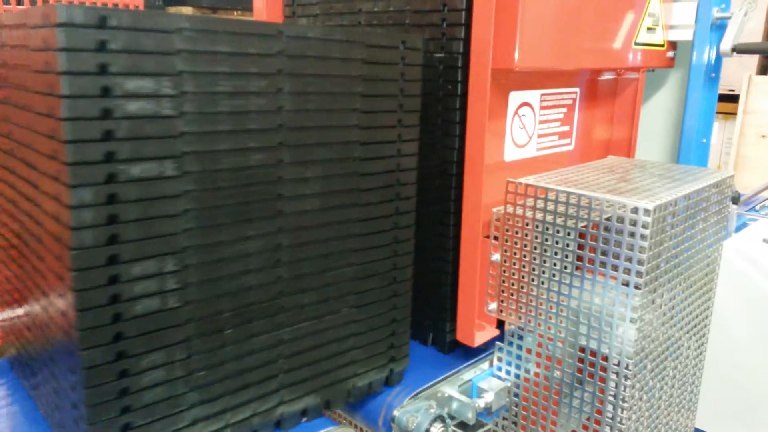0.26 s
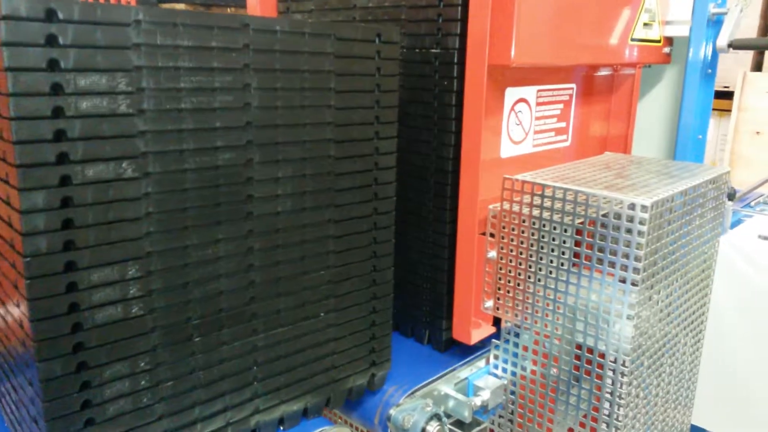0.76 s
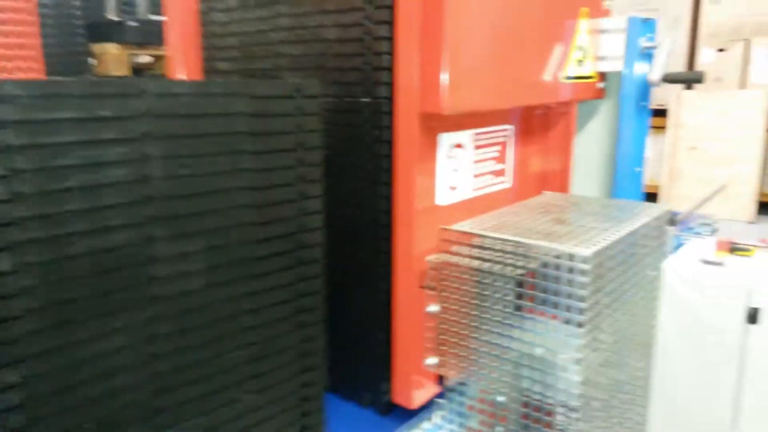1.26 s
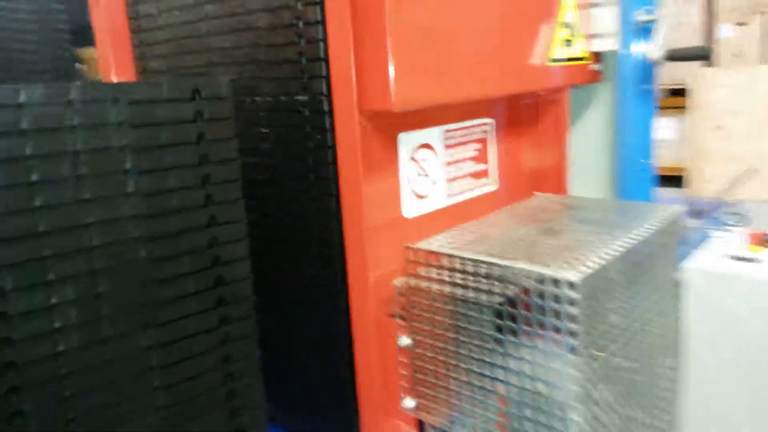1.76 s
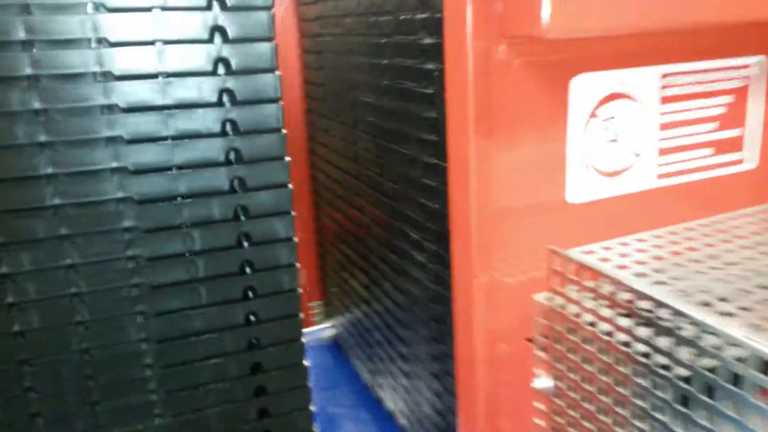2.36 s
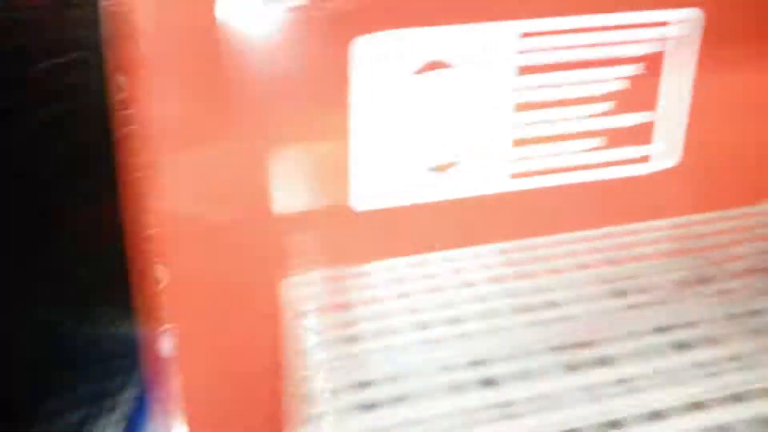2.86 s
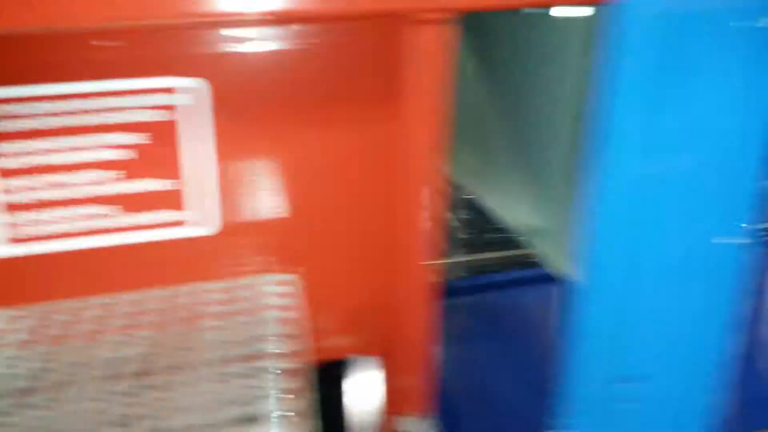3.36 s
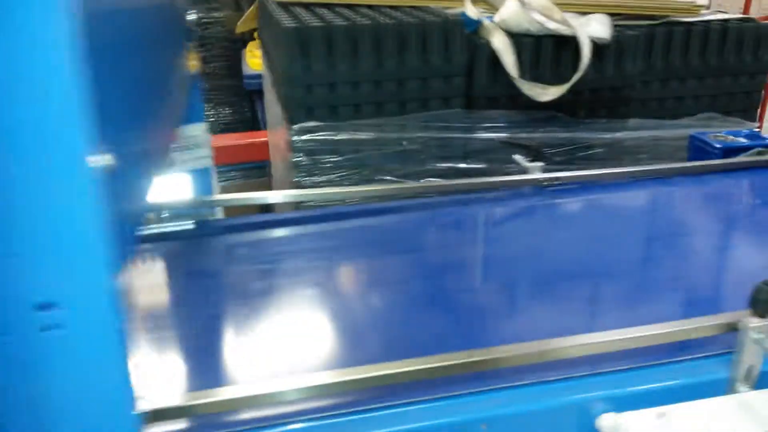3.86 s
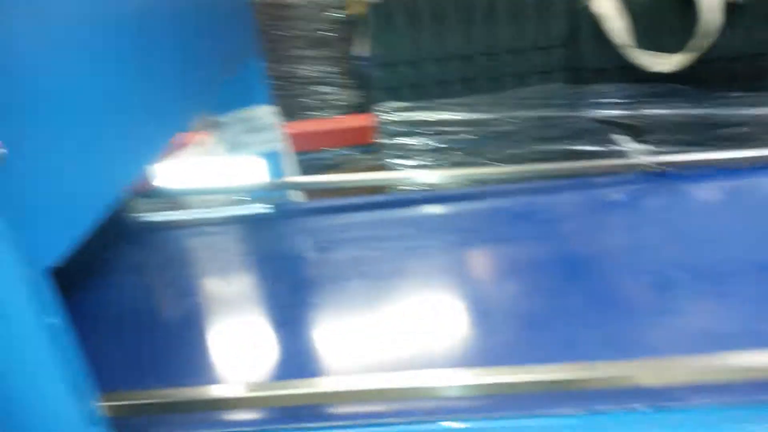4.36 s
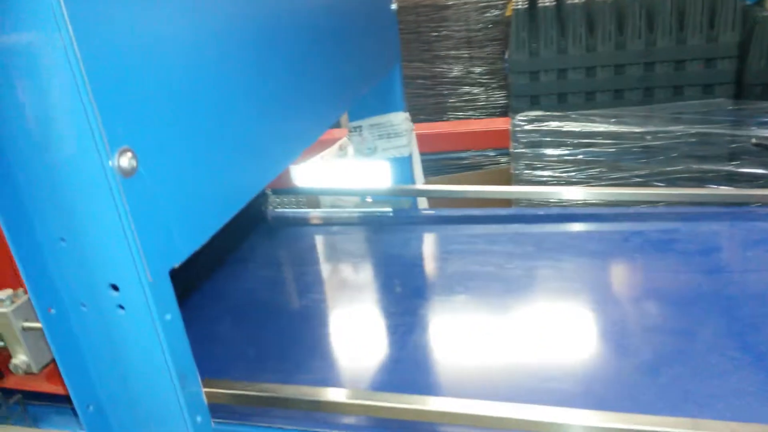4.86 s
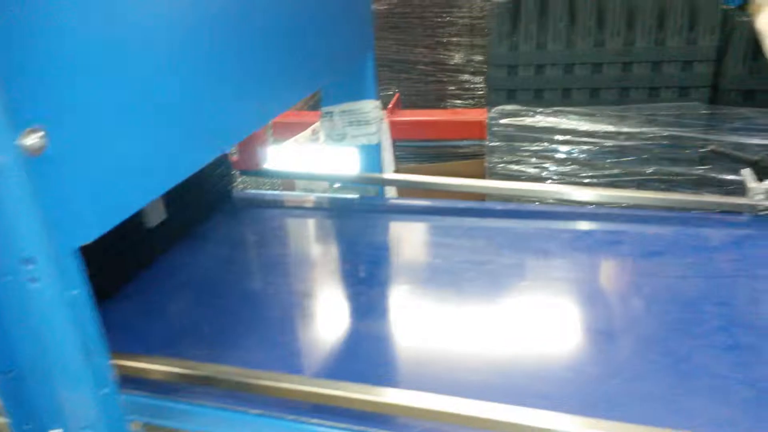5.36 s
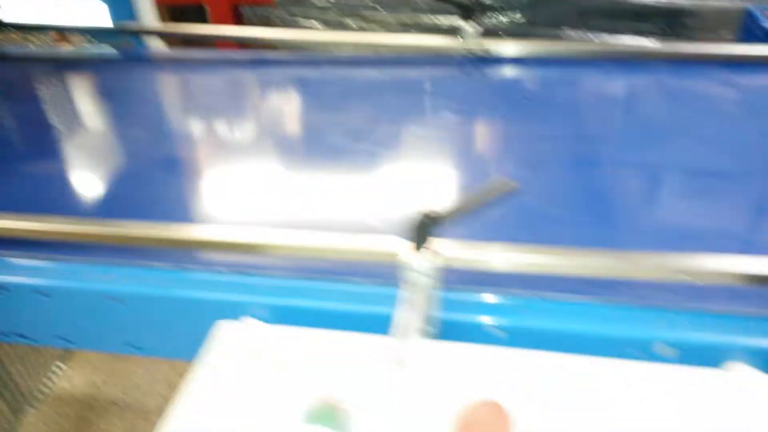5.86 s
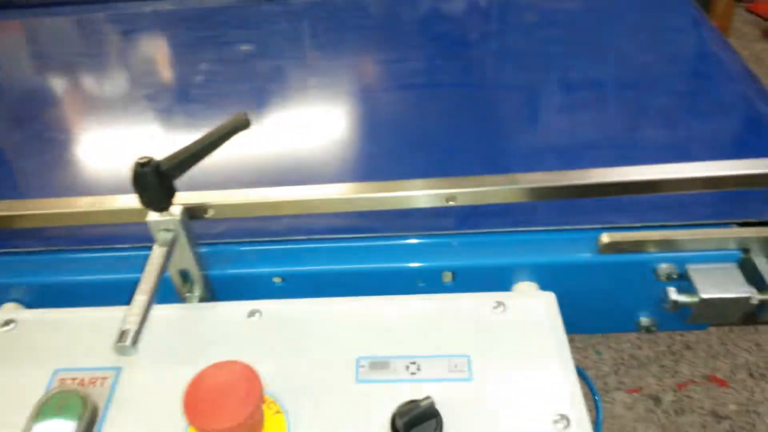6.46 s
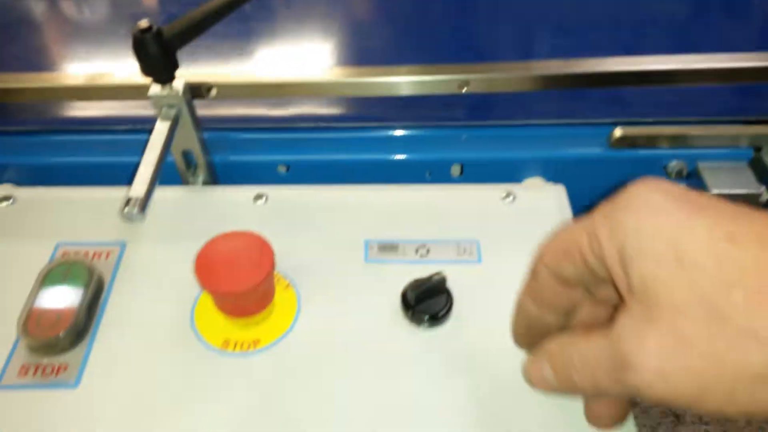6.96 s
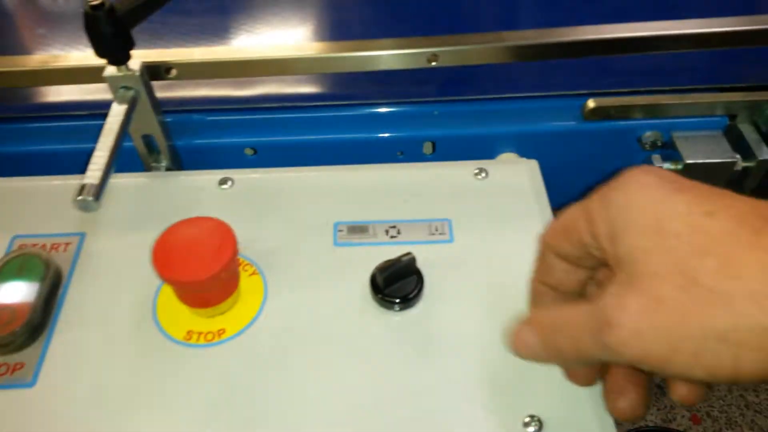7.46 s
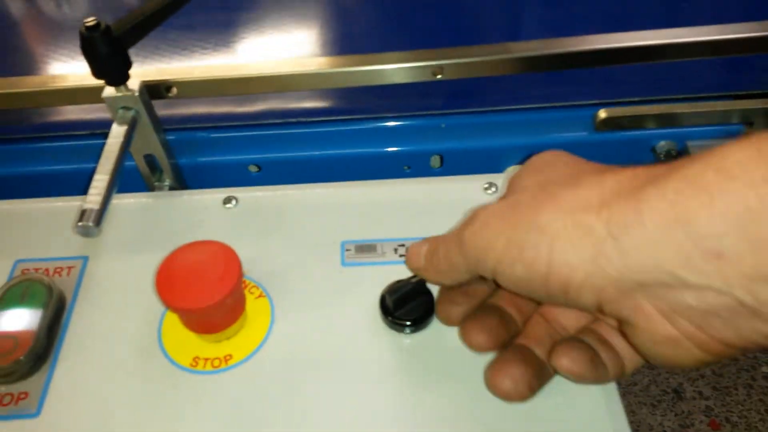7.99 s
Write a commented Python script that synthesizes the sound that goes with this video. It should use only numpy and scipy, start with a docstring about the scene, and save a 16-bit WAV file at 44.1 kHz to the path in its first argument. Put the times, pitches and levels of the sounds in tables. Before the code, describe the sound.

A conveyor motor whines and brakes to rest as plastic trays clatter, then after quiet scraping two loud bursts of clacks and small hard clicks.

```python
"""Workshop, close to a tray conveyor, on a hand-held microphone that moves to the control panel.
The inverter-fed motor whines on modulated sines over a rumbling belt of filtered noise, brakes and holds.
Stacks of plastic trays knock, scrape and clatter: noise bursts ring resonances of tray, stack and steel.
A small hard part clicks to rest in high resonances, and a soft whirr of banded noise swells and fades.
Mains hum in wavering sines, a machinery drone and a thin hiss of filtered noise go on underneath."""
import sys
import numpy as np
from scipy import signal
from scipy.fft import rfft, irfft
from scipy.io import wavfile

SR = 44100
rng = np.random.default_rng(int(sys.argv[2]) if len(sys.argv) > 2 else 0)


def log_audio(samples):
    """Write samples as a 16-bit WAV file to the path given in sys.argv[1]."""
    # one column per channel
    frames = np.atleast_2d(samples).T
    # limit to full scale, then quantise
    limited = np.clip(frames, -1, 1)
    pcm = np.round(limited * 32767).astype(np.int16)
    wavfile.write(sys.argv[1], SR, pcm)


N = 362943
T = np.arange(N) / SR  # seconds


# motor supply: a straight ramp up to the running frequency, then a rounded braking ramp to rest
RUN_HZ, RAMP_HZ_PER_S, FULL_SPEED_S = 42, 120, 0.125
BRAKE_S, STOP_S, BRAKE_CURVE = 0.3, 0.6, 1.35


def drive_hz():
    """The inverter's drive frequency sets the motor speed: it ramps up, runs briefly and brakes."""
    ramp_up = RUN_HZ - RAMP_HZ_PER_S * np.maximum(FULL_SPEED_S - T, 0)
    braking = np.clip((T - BRAKE_S) / (STOP_S - BRAKE_S), 0, 1)
    return ramp_up * (1 - braking ** BRAKE_CURVE)


CARRIER_HZ, CRAWL_HZ = 8003, 10670
# sidebands of the switching carrier: order [multiple of the drive frequency]
SIDEBAND_ORDERS = [-10, -6, -2, 2, 10, 14]
# the same sidebands: level_db [dB, relative]
SIDEBAND_LEVELS = [-9, -18, -5.5, 3.5, -15.5, -26]
# whine: level_db at full speed, extra level_db near rest, drive frequency below which it fades
WHINE_DB, WHINE_SLOW_DB, WHINE_FADE_HZ = -37, 10.5, 21.4
# high inverter tone at low drive frequency: start_s [s], end_s [s], level_db [dB]
CRAWL_TONES = [(-.02, 0.03, -54), (0.494, 0.547, -42.5)]
CRAWL_ATTACK_S, CRAWL_RELEASE_DB_PER_S = 0.017, 204
# the bare carrier holds the stopped motor
HOLD_START_S, HOLD_END_S, HOLD_DB = 0.5, 1.098, -57


def motor():
    """Inverter sidebands close in on the carrier and grow as the motor slows, then fade; a held tone stays on."""
    drive = drive_hz()
    turn = 2 * np.pi * np.cumsum(drive) / SR
    carrier = 2 * np.pi * CARRIER_HZ * T
    sidebands = sum(undb(db + 2.6 * walk(30.3)) * np.sin(carrier + order * turn)
                    for order, db in zip(SIDEBAND_ORDERS, SIDEBAND_LEVELS))
    fizz = unit(ring(noise(N, 0.7), [(CARRIER_HZ, 400, 0)]))
    fade = np.minimum(drive / WHINE_FADE_HZ, 1) ** 2
    level = undb(WHINE_DB + WHINE_SLOW_DB * (1 - drive / RUN_HZ)) * fade
    whine = (unit(sidebands) + undb(-21) * fizz) * level

    crawl_level = sum(undb(db) * swell(start, end, CRAWL_ATTACK_S, CRAWL_RELEASE_DB_PER_S)
                      for start, end, db in CRAWL_TONES)
    rough_tone = np.sin(2 * np.pi * CRAWL_HZ * T + 0.7 * walk(140)) * (1 + 0.84 * walk(170))
    crawl = unit(rough_tone) * crawl_level
    held = unit(np.sin(carrier)) * undb(HOLD_DB) * gate(HOLD_START_S, HOLD_END_S, 0.059)
    return whine * pan(16.7) + (crawl + held) * pan(7.6)


# gear tones: order [multiple of the drive frequency]
GEAR_TONE_ORDERS = [4.8, 5.3, 7.15, 10.3, 12.1]
# the same gear tones: level_db [dB, relative]
GEAR_LEVELS = [-8, -2, -8, -11, -4]
# spectrum of the belt rumble: pitch_hz [Hz], level_db [dB, relative]
RUMBLE_SPECTRUM = [(24, -43), (40, -22), (134, -4.5), (171, -4), (214, -8.5), (255, -4), (421, -6.5),
                   (459, -17), (509, -1.5), (545, -11), (2500, -38.5), (3250, -33), (5500, -120)]
# spectrum of the belt hiss: pitch_hz [Hz], level_db [dB, relative]
BELT_HISS_SPECTRUM = [(600, 3.5), (1200, 1.5), (2500, -7.5), (4500, -4), (7000, -3), (8500, 1.5),
                      (10000, -25.5), (15000, -35)]
# booming of the loaded belt frame: pitch_hz [Hz], width_hz [Hz], level_db [dB, relative]
BELT_FRAME_MODES = [(147.5, 12.3, 1), (232.5, 24, -2), (298.3, 47, -0.5)]
# full level, when each starts to die away, and how fast
RUMBLE_DB, RUMBLE_COAST_S, RUMBLE_DB_PER_S = -29, 0.37, 34
HISS_DB, HISS_COAST_S, HISS_DB_PER_S = -33.5, 0.36, 45
# the rumble starts lower and builds as the belt takes up its load
TAKE_UP_S, TAKE_UP_DB = 0.48, 11


def belt():
    """Gear tones sing only near full speed; the loaded belt rumbles, booms and hisses, then coasts."""
    drive = drive_hz()
    turn = 2 * np.pi * np.cumsum(drive) / SR
    speed = drive / RUN_HZ
    gears = sum(undb(db + 2 * walk(24)) * np.sqrt(2) * np.sin(order * turn + 0.48 * walk(37))
                for order, db in zip(GEAR_TONE_ORDERS, GEAR_LEVELS))
    boom = wandering(ring(noise(N, 0.12), BELT_FRAME_MODES), BELT_FRAME_MODES, rate=13.46, spread_db=1)
    rumble = unit(colour(noise(N, 0.3), RUMBLE_SPECTRUM))
    rumble = undb(-5) * rumble + undb(-9) * boom + gears * speed ** 4
    hiss = unit(colour(noise(N, 1.0, grain_db=3.5), BELT_HISS_SPECTRUM)) * pan(-2)

    # the highest speed so far: braking is left to the coasting below
    run_up = np.maximum.accumulate(speed) ** 1.46
    load_db = -TAKE_UP_DB * np.maximum(1 - T / TAKE_UP_S, 0)
    rumble = rumble * undb(RUMBLE_DB + load_db) * coast(RUMBLE_COAST_S, RUMBLE_DB_PER_S)
    hiss = hiss * undb(HISS_DB) * coast(HISS_COAST_S, HISS_DB_PER_S)
    return (rumble + hiss) * run_up * undb(1.1 * walk(25))


# tray blows: start_s [s], level_db [dB], then before trim body_db, edge_db, rattle_db, steel_db
# [dB, relative]: hollow body, sharp edge, rattle of the nested trays, steel ring
TRAY_BLOWS = [(0.1452, -13, -24, -20, 2, -21.5), (0.1627, -24, -15, -14, -6, -17),
              (0.3239, -26.5, -7.5, -14, -9, -17), (0.4099, -21.5, -20, -35, -17, -35),
              (0.5362, -18.5, -21, -43, -19, -20), (0.6487, -24.5, -44, -12, -20, -16),
              (0.7604, -25, -33, -18, -20, -25), (0.7695, -21, -22, -22, -35, -31),
              (0.7851, -26.5, -13.5, -19, -21, -24), (0.8713, -34.5, -14, -19, -11, -27),
              (0.9674, -39, -44, -18, -13, -21), (1.411, -43, -7.5, -21, -18, -33),
              (1.677, -23, -24.5, -22.5, -6, -24), (1.7553, -26.5, -28, -44, 7, -36),
              (2.1707, -28.5, -15.5, -17.5, -15, -42), (4.175, -33.5, -10, -37, -4, -28),
              (4.9915, -17, -23, -23, -13, -23), (5.0018, -5.5, -29, -20.5, -7.5, -32.5),
              (5.0112, -9.5, -27.5, -26.5, -12, -21.5), (5.0262, -8, -26, -19.5, -5.5, -26.5),
              (5.0431, -7, -23, -20, -10.5, -30), (5.0773, -14, -15, -35.5, -8.5, -26.5),
              (5.1055, -20.5, -10, -27, -11.5, -32), (5.2099, -7, -20.5, -22.5, -16, -42.5),
              (5.2278, -14.5, -12, -25, -28.5, -31.5), (5.3112, -17.5, -23.5, -21.5, -13.5, -28.5),
              (5.581, -28.5, -9.5, -24.5, 5.5, -28), (5.6727, -20, -11.5, -37, -9.5, -17.5),
              (5.7785, -28.5, -15, -30.5, -11, -23.5), (5.8224, -15, -19.5, -19, -16, -22),
              (5.8368, -10, -41.5, -15.5, -9, -31.5), (5.8588, -14, -31, -18, 15.5, -17),
              (6.2143, -10.5, -30.5, -60.5, -10, -15.5), (6.2222, -12, -45, -41, -18, -21.5),
              (6.247, -9.5, -51, -23.5, -11, -20), (6.2956, -16.5, -27.5, -36, 0, -25),
              (6.4078, -22.5, -25, -51, 3, -23)]
# spectrum of the tray shell: pitch_hz [Hz], level_db [dB, relative]
TRAY_SPECTRUM = [(900, -23), (1500, -7.5), (2200, -6.5), (3000, -1.5), (4300, 2), (6300, 4), (7600, 2),
                 (9000, -14), (12000, -33)]
# hollow modes of a stack, also rung by slides(): pitch_hz [Hz], width_hz [Hz], level_db [dB, relative]
HOLLOW_MODES = [(144, 43, -0.5), (230, 56, -0.5), (380, 49, -1), (450, 30, -5.5), (672.5, 89, -7.5),
                (900, 320, 2.5), (1024, 63, -4.5), (1116, 39, -2), (1467, 35, 0.5), (1770, 29, -12)]
# steel guides struck by the trays: pitch_hz [Hz], width_hz [Hz], level_db [dB, relative]
STEEL_GUIDE_MODES = [(1377, 59, -1.5), (2673, 90, 1.5), (4150, 310, -2), (4730, 130, 2), (5797, 290, 3.5),
                     (6960, 400, 1.5)]
CLACK_PAN_DB = -2.5  # left minus right


def clacks(size=13230):
    """Each blow cracks, booms in the hollow stack, rings the steel guides and rattles the nested trays."""
    out, t = np.zeros((2, N)), np.arange(size) / SR
    edge_spectrum = [(7000, 0.5), (9500, -4), (14500, -14)]
    for s, db, body_db, edge_db, rattle_db, steel_db in TRAY_BLOWS:
        # the rattle is a run of uneven jolts, each about 1 ms long
        jolts = np.repeat(undb(6 * rng.standard_normal(size // 45) - 1.5), 45)
        crack = undb(-60 * t / 0.012)
        rattle = jolts * undb(rattle_db - 60 * t / 0.19)
        force = crack + rattle
        shell = strength(colour(noise(size, 1.0, grain_db=6) * force, TRAY_SPECTRUM))
        body = strength(ring(noise(size, 0.68) * force, HOLLOW_MODES))
        edge = strength(colour(noise(size, 0.83, grain_db=3) * force, edge_spectrum))
        # ringing twice makes the modes build up more slowly
        steel = strength(ring(ring(noise(size, 1) * force, STEEL_GUIDE_MODES), STEEL_GUIDE_MODES))
        blow = undb(-15) * shell + undb(body_db - 5.5) * body
        blow = blow + undb(edge_db - 3) * edge + undb(steel_db) * steel
        add(out, s, undb(db) * pan(CLACK_PAN_DB) * blow)
    return out


# low and mid resonant thumps, some alone, some sounding together with a tray blow:
# start_s [s], level_db [dB], pitch_hz [Hz], decay_s [s for the driving noise to fall 60 dB]
RESONANT_THUMPS = [(0.031, -31.5, 297, 0.26), (1.411, -74, 507, 0.1), (1.677, -41, 1600, 0.053),
                   (1.678, -44, 2650, 0.23), (1.841, -54, 274, 0.25), (2.119, -48.5, 283, 0.33),
                   (2.146, -45.5, 870, 0.096), (2.438, -57, 170, 0.19), (2.686, -63, 1130, .08),
                   (4.173, -50, 490, 0.25), (4.251, -82, 1100, 0.028), (4.588, -48, 202, 0.12),
                   (4.894, -46, 207, 0.37), (5.078, -39.5, 1130, 0.11), (5.103, -37.5, 1165, .05),
                   (5.21, -30.5, 970, .06), (5.228, -33, 1020, .08), (5.227, -44.5, 225, 0.37),
                   (5.548, -46.5, 410, 0.55), (5.675, -47, 430, 0.41), (5.826, -44.5, 1400, 0.26),
                   (6.215, -50.5, 915, .2), (6.55, -59, 790, 0.044), (7.485, -73, 910, 0.024),
                   (7.62, -71, 940, .033)]
THUMP_WIDTH_HZ, THUMP_WIDTH_SHARE = 120, 0.22  # bandwidth: a base plus a share of the pitch


def thumps(size=17640):
    """Each thump is a decaying noise burst that rings one band, alone or together with a tray blow."""
    out, t = np.zeros((2, N)), np.arange(size) / SR
    for s, db, hz, decay in RESONANT_THUMPS:
        mode = [(hz, THUMP_WIDTH_HZ + THUMP_WIDTH_SHARE * hz, 0)]
        burst = noise(size, 0.11) * undb(-60 * t / decay)
        add(out, s, undb(db) * strength(ring(ring(burst, mode), mode)))
    return out


# clicks of the small hard part: start_s [s], level_db [dB, before trim], pan_db [dB, left minus right]
PART_CLICKS = [(4.9214, -47, 4), (5.1796, -24, 4), (5.487, -43, -7), (6.4442, -8, 0), (6.535, -16.5, -10),
               (6.562, -10.5, -3.5), (6.6221, -24, -9), (6.7104, -8, -6), (6.771, -11, -1),
               (6.8034, -24, -14), (6.824, -22.5, 1), (6.8357, -23.5, -4.5), (7.269, -47, -5),
               (7.3347, -48, -6)]
# ringing of the part: pitch_hz [Hz], width_hz [Hz], level_db [dB, relative, varied at each contact]
PART_MODES = [(2680, 640, -7), (4370, 110, -8), (5180, 440, 0), (6240, 260, 13.5), (7030, 470, 8),
              (8150, 180, -17)]


def clicks(size=6615):
    """A small hard part snaps, buzzes faintly and rings high; each contact weights its modes anew."""
    out, t = np.zeros((2, N)), np.arange(size) / SR
    snap = undb(-60 * t / 0.008)
    buzz = undb(-28.5 - 60 * t / 0.13)
    spectrum = [(500, -3.5), (2500, -11.5), (4200, 5), (8500, -4), (14000, -18)]
    for s, db, pan_db in PART_CLICKS:
        modes = [(hz, width, mode_db + 2 * rng.standard_normal()) for hz, width, mode_db in PART_MODES]
        rung = colour(ring(noise(size, 0.95) * (snap + buzz), modes), spectrum)
        add(out, s, undb(db - 20.5) * pan(pan_db) * strength(rung))
    return out


# strokes of sliding trays: start_s [s], length_s [s], level_db [dB, before trim],
# treble_db [dB, relative to the stroke, before trim]
SLIDE_STROKES = [(1.373, 0.016, -62, 1.5), (1.642, 0.063, -54, 5), (1.763, 0.19, -61.5, 1),
                 (2.059, 0.089, -57, 0.5), (2.408, 0.037, -61.5, 9), (2.55, 0.11, -68, 3.5),
                 (2.659, 0.075, -57, -2), (2.735, 0.12, -69, 9.5), (2.835, 0.16, -53, 0),
                 (3.39, .26, -64.5, 2.5), (3.674, 0.044, -60, 4), (3.766, 0.66, -76.5, 10),
                 (4.158, 0.033, -48, 1.5), (4.483, 0.098, -49, -0.5), (4.636, 0.087, -45, 1.5),
                 (4.722, .08, -53.5, 5.5), (4.858, .04, -59, 5.5), (5.366, 0.15, -66, 7.5),
                 (5.53, 0.057, -45.5, -4.5), (5.932, 0.13, -50, -2.5), (7.912, 0.18, -69, -17)]
# spectrum of the dragging body: pitch_hz [Hz], level_db [dB, relative]
SLIDE_BODY_SPECTRUM = [(88, -62), (150, -9), (211, -1), (246, -7.5), (342, -5), (609, -5), (985, -8.5),
                       (1780, -10.5), (4000, -16.5), (5200, -66.5), (8800, -120)]
# spectrum of the hissing edges: pitch_hz [Hz], level_db [dB, relative]
SLIDE_TREBLE_SPECTRUM = [(2000, -9), (4000, -4), (6500, 2.5), (8000, -3.5), (10000, -11.5), (14500, -15.5)]
SLIDE_ATTACK_S, SLIDE_RELEASE_DB_PER_S = 0.059, 131


def slides():
    """Plastic dragging: gritty noise for dense tiny slips rings the hollow stack and hisses at its edges."""
    drag = unit(colour(noise(N, 0.39, grain_db=6), SLIDE_BODY_SPECTRUM))
    hollow = wandering(noise(N, 0.63, grain_db=5), HOLLOW_MODES, rate=15, spread_db=2)
    body = undb(-1.5) * drag + undb(-6.5) * hollow
    treble = unit(colour(noise(N, 1.0, grain_db=1.5), SLIDE_TREBLE_SPECTRUM)) * pan(-1.3)
    # overlapping strokes add in power
    body_power = treble_power = 0
    for start, length, db, treble_db in SLIDE_STROKES:
        stroke = undb(db) * swell(start, start + length, SLIDE_ATTACK_S, SLIDE_RELEASE_DB_PER_S)
        body_power = body_power + stroke ** 2
        treble_power = treble_power + (stroke * undb(treble_db)) ** 2
    body = undb(-0.5) * body * np.sqrt(body_power)
    treble = undb(2.5) * treble * np.sqrt(treble_power)
    return (body + treble) * undb(1.9 * walk(90))


def faint_whirr():
    """Two broad resonances of noise: a soft mid-pitched whirr swells and fades after the last tray blow."""
    modes = [(570, 180, 3.5), (747, 270, -1.5)]
    whirr = unit(ring(ring(noise(N, 0.46), modes), modes))
    return undb(-70.5) * whirr * gate(6.77, 7.44, 0.23)


# ringing of the steel frame and guard: pitch_hz [Hz], width_hz [Hz], level_db [dB, relative]
STEEL_FRAME_MODES = [(1200, 4.7, -13.5), (1430, 14, -6), (2890, 17, -5.5), (3220, 6.4, -9.5),
                     (3860, 25, -12.5), (4590, 24, -6), (4740, 17, -4), (5370, 16, -11), (5130, 25, -6.5),
                     (6560, 13, -7), (7410, 22, 3), (7940, 22, -5.5)]


def frame(blows):
    """Narrow steel resonances ring after each blow, with left and right exchanged for width."""
    return undb(-6.5) * ring(blows[::-1], STEEL_FRAME_MODES)


def room(x, t60=0.47, near_t60=0.066, size=35280):
    """Close machine panels answer with a short burst of decaying noise; the hall rings on."""
    t = np.arange(size) / SR
    onset = np.clip(t / 0.006, 0, 1)
    near = unit(noise(size, 0.57, grain_db=-0.5) * onset * undb(-60 * t / near_t60))
    hall = unit(noise(size, 0.79) * onset * undb(-60 * t / t60))
    response = (undb(-10) * near + undb(-6.5) * hall) / np.sqrt(size)
    response = colour(response, [(60, 2.5), (500, -5.5), (2000, 1.5), (7000, -2), (14000, 0)])
    return signal.fftconvolve(x, response, axes=1)[:, :N]


# mains hum: pitch_hz [Hz], level_db [dB, relative]
MAINS_HUM = [(100, 1.5), (149.5, -15.5), (200, -2), (300, -6.5), (400, -14)]
# spectrum of the machinery drone: pitch_hz [Hz], level_db [dB, relative]
DRONE_SPECTRUM = [(15, -25.5), (25, 2), (48, -14.5), (87, 4), (146, -2.5), (201, 0), (250, -6.5), (306, -8),
                  (352, -10), (3000, -28.5), (3900, -58), (6600, -120)]
# spectrum of the thin hiss: pitch_hz [Hz], level_db [dB, relative]
HISS_SPECTRUM = [(1000, -2.5), (2500, -4.5), (4000, -3.5), (6500, 1), (9000, -3.5), (14000, -3.5)]
# level of hum and drone, uneven and fainter at the end as the microphone moves to the control panel:
# time_s [s], level_db [dB]
DRONE_LEVEL = [(1.5, -64), (3, -62.5), (4.2, -65), (5.3, -58), (6.2, -68), (7, -65), (7.6, -69)]
SHOP_HISS_DB = -67


def workshop():
    """Wavering mains harmonics over a low noise drone of machinery and a thin hiss."""
    hum = sum(undb(db + 2 * walk(14)) * np.sqrt(2) * np.sin(2 * np.pi * hz * T + 0.43 * walk(60))
              for hz, db in MAINS_HUM)
    drone = unit(colour(noise(N, 0.36), DRONE_SPECTRUM))
    low = undb(-3) * hum + undb(-1.5) * drone
    hiss = unit(colour(noise(N, 1.0), HISS_SPECTRUM)) * undb(SHOP_HISS_DB + 0.7 * walk(30))
    return low * undb(curves(DRONE_LEVEL)[0]) + hiss


def undb(db):
    """Decibels to gain."""
    return np.exp(np.asarray(db) * np.log(10) / 20)


def unit(x):
    """Scale to rms 1."""
    return x / np.sqrt(np.mean(x ** 2) + 1e-20)


def strength(x, size=882):
    """Scale a blow so that its first 20 ms have rms 1."""
    return x / np.sqrt(np.mean(x[:, :size] ** 2))


def curves(rows):
    """The columns of a table after its times, joined by straight lines in time."""
    s, *columns = np.transpose(rows)
    return [np.interp(T, s, c) for c in columns]


def gate(start, end, fade):
    """On between two times, with sloping edges."""
    return np.clip(np.minimum(T - start, end - T) / fade + 0.5, 0, 1)


def coast(s, db_per_s):
    """Full level until a time, then a steady fall in dB."""
    return undb(-db_per_s * np.maximum(T - s, 0))


def swell(start, end, attack, db_per_s):
    """A straight rise over the attack, times a steady fall in dB from the end time."""
    return np.clip((T - start) / attack, 0, 1) * coast(end, db_per_s)


def pan(db):
    """Left and right gains for a level difference, left minus right."""
    return undb(np.array([[db], [-db]]) / 2)


def walk(rate):
    """Chance values, rate per second, joined by straight lines; their spread is near 1."""
    points = rng.standard_normal(2048)
    return np.interp(T * rate, np.arange(len(points)), points)


def noise(size, side, grain_db=0):
    """Stereo noise with a given side share; uneven sample sizes make it gritty."""
    mid, wide, sizes = rng.standard_normal((size, 3)).T
    stereo = mid + side * wide * np.array([[1], [-1]])
    return unit(stereo * undb(grain_db * sizes))


def colour(x, points):
    """Causal minimum-phase filter through (Hz, dB) points, falling 17 dB an octave outside them."""
    size = 4096
    hz, db = np.transpose(points)
    octave = np.log2(np.maximum(np.arange(size // 2 + 1) * SR / size, 5))
    below = np.maximum(np.log2(hz[0]) - octave, 0)
    above = np.maximum(octave - np.log2(hz[-1]), 0)
    gain = undb(np.interp(octave, np.log2(hz), db) - 17 * (below + above))
    # folding the cepstrum onto positive times makes the filter causal
    cepstrum = irfft(np.log(gain))
    cepstrum[1:size // 2] *= 2
    cepstrum[size // 2 + 1:] = 0
    response = irfft(np.exp(rfft(cepstrum)))
    return signal.fftconvolve(x, response[None], axes=1)[:, :x.shape[1]]


def ring(x, modes):
    """Resonances (Hz, width in Hz, dB) side by side."""
    return sum(undb(db) * signal.lfilter(*signal.iirpeak(hz, hz / width, SR), x)
               for hz, width, db in modes)


def wandering(x, modes, rate, spread_db):
    """Resonances that each swell and fade by chance as the contact points shift."""
    return unit(sum(ring(x, [mode]) * undb(spread_db * walk(rate)) for mode in modes))


def add(out, s, x):
    """Mix a sound in at a time."""
    i = max(int(s * SR), 0)
    out[:, i:i + x.shape[1]] += x[:, :N - i]


def scene():
    """Blows ring the steel frame, and with the thumps excite the room; the other sounds are added directly."""
    hard_blows = clacks() + clicks()
    blows = hard_blows + frame(hard_blows) + thumps()
    return motor() + belt() + blows + room(blows) + slides() + faint_whirr() + workshop()


TOP_HZ = 14750


def record(dry):
    """The recorder cuts the top with a steep low-pass filter."""
    return signal.sosfilt(signal.ellip(8, 0.2, 70, TOP_HZ, fs=SR, output="sos"), dry)


dry = scene()
out = record(dry)
log_audio(out)
```